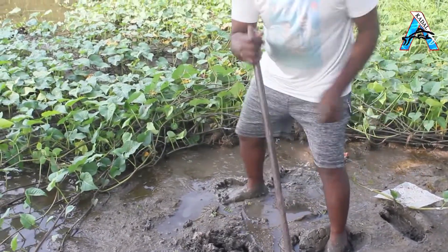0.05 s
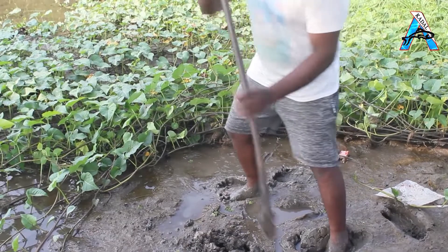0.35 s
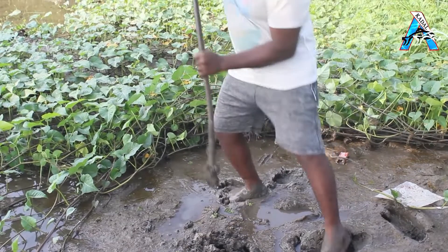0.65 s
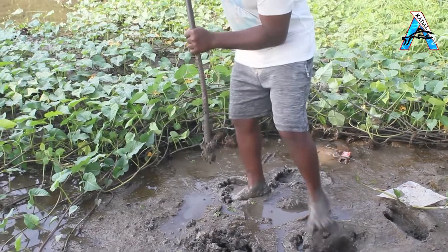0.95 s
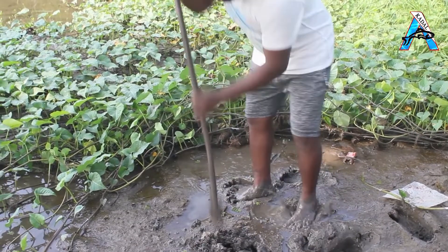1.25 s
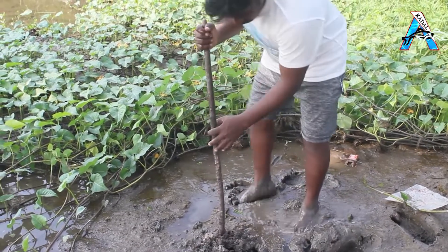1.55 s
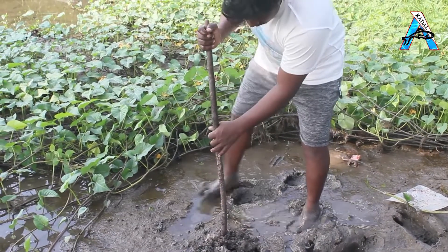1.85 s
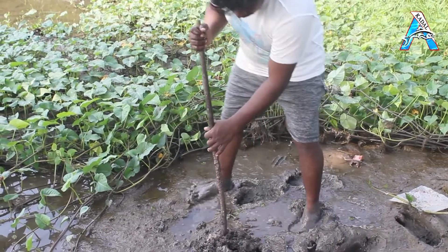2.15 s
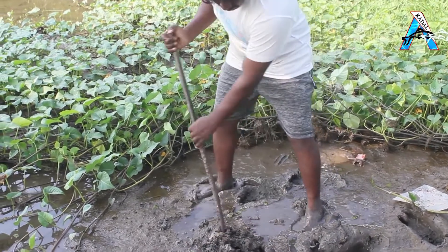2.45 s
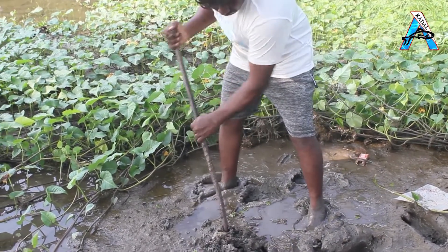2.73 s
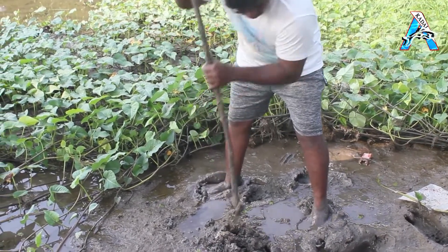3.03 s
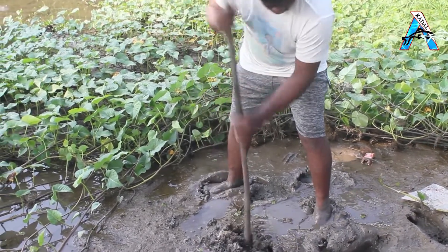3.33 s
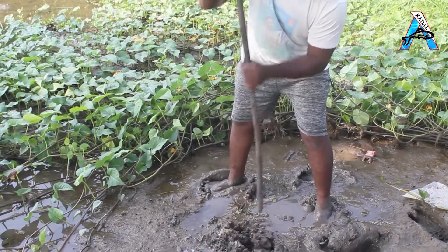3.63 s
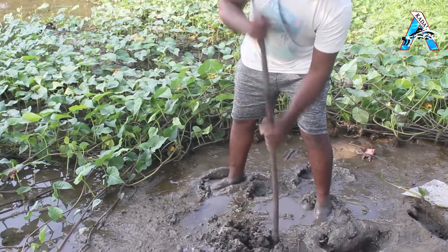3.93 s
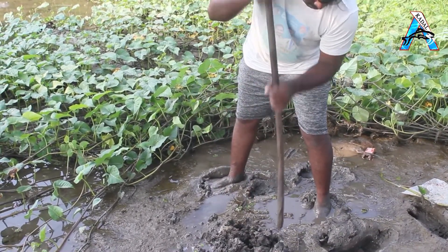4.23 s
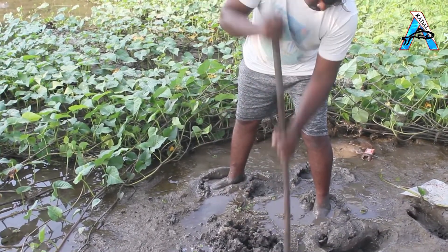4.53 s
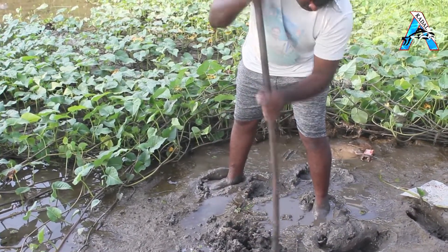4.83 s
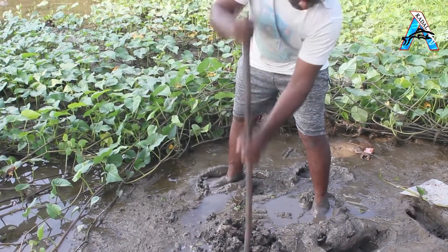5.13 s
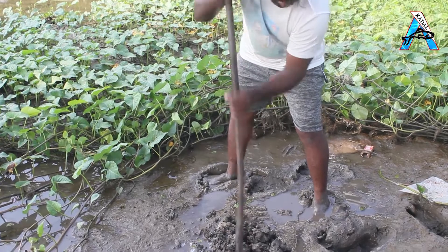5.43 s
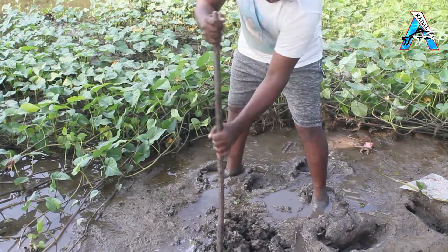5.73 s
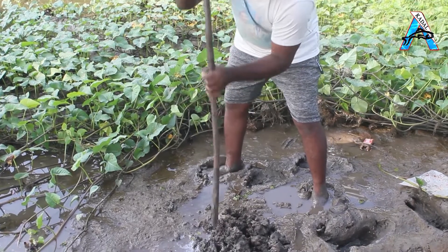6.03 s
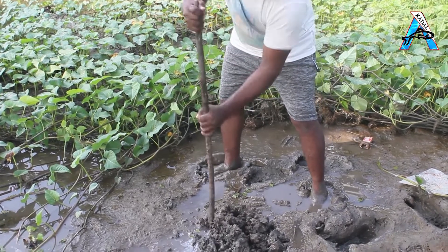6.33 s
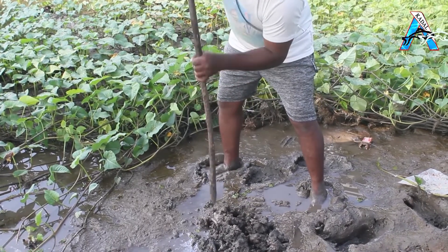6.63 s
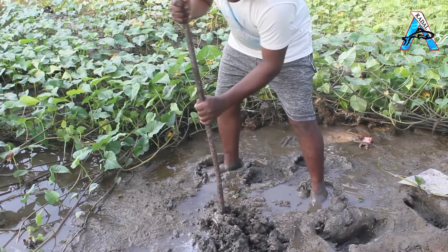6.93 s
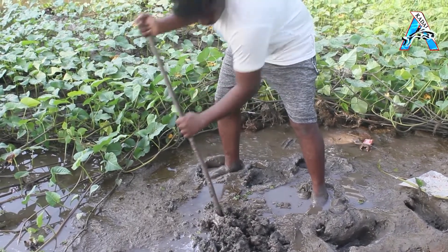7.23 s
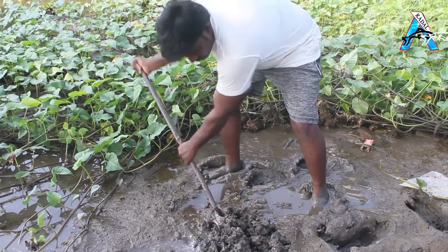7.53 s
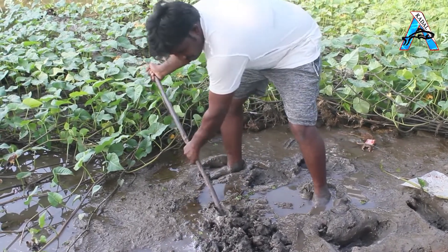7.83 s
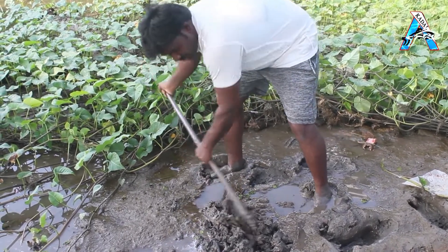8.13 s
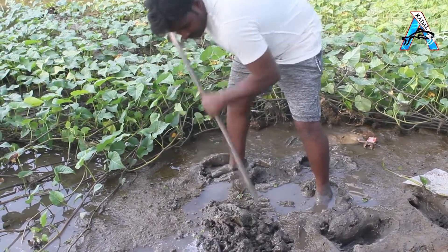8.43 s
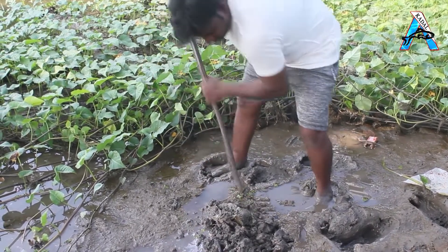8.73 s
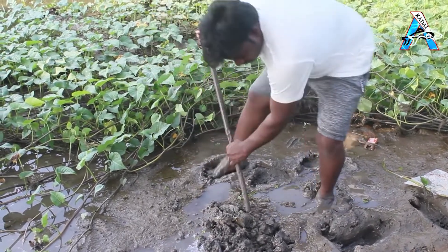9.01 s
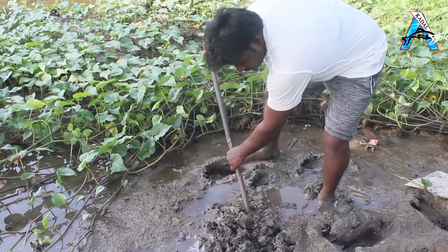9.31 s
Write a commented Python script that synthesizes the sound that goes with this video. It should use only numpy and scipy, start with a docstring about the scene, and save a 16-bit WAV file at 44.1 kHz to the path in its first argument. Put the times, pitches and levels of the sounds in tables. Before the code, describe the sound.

A metal pole jabs and scrapes in wet mud with sharp smacks and dull clanks, over faint trilling insects.

```python
"""An iron digging pole is jabbed into wet pond mud, levered and pulled out again.
Impact and friction on grit excite its bending modes, so it clanks and scrapes in its hole.
Air pockets in the mud open with wet smacks, each ringing as a damped cavity resonator.
Insects trill in the plants, a bird whistles, a rooster crows and machinery hums far off.
The banks reflect the digging and the whistles as a short echo."""
import sys
import numpy as np
from scipy import signal
from scipy.fft import next_fast_len
from scipy.io import wavfile
from scipy.ndimage import uniform_filter1d

SR = 44100
rng = np.random.default_rng(int(sys.argv[2]) if len(sys.argv) > 2 else 0)


def int16_out(signal):
    """Quantize to a 16-bit WAV file."""
    q = np.round(np.clip(np.atleast_2d(signal).T, -1, 1) * 32767)
    wavfile.write(sys.argv[1], SR, q.astype(np.int16))


N = 422037
TIME = np.arange(N) / SR

# spectra of the open air and of the insect chorus: f/Hz, level/dB
AIR_SPECTRUM = [(20, -26), (36, -49), (62, -2), (100, -3), (250, -6), (600, -10), (1500, -12.5),
                (3000, -18), (6000, -22), (9500, -82), (12000, -44), (15500, -66)]
CHORUS_SPECTRUM = [(5500, -48.5), (6700, -14.5), (7000, -6), (7400, -6.5), (7700, 1.5), (7950, 2.5),
                   (8200, -7), (8550, -5), (8800, -23), (10500, -40)]
# tones of far machinery: onset t/s, f/Hz, level/dB
HUM_TONES = [(0, 51.5, -52), (7.9, 90.9, -58.5), (8.5, 167, -59)]
# bouts of the nearest cricket: start t/s, end t/s
CRICKET_BOUTS = [(.19, 1.54), (1.94, 3.14), (3.54, 4.92), (5.11, 6.6), (6.76, 7.93), (8.33, 9.3)]
# spectra of tiny bursting films and of the film tearing over a pocket: f/Hz, level/dB
FIZZ_SPECTRUM = [(1000, -15), (3000, 6.5), (6000, -1.5), (10000, -2), (12500, -10.5), (15500, -28)]
FILM_SPECTRUM = [(100, 8), (600, -24), (2000, 10.5), (5000, 5.5), (8500, -0.5), (11000, -6), (15500, -37)]
# cavity modes: frequency ratio, level/dB, share of the brightness added to that level
CAVITY_MODES = [(1, 0, 0), (1.3, -6, 0.5), (1.75, -5, 1), (2.4, -8.5, 1)]
# air pockets opening, and the pole's 1.7 kHz clank at 8.81 s:
# t/s, level/dB, f/Hz, brightness/dB, peeling time/s
RESONANCES = [(.0505, -28.5, 1566, -6, 0.0052), (.607, -26.5, 1025, 4.5, 0.017),
              (.614, -25.5, 724, 5.5, .004), (0.714, -39, 1960, 7, .001), (.751, -39, 5040, 7, 0.0013),
              (.766, -32, 1680, 7, .004), (1.116, -37.5, 2400, -4, 0.0024), (1.171, -25, 1295, 8.5, 0.0037),
              (1.594, -38, 986, 3, 0.0026), (1.96, -37, 1480, -13.5, 0.0052), (1.983, -30, 1465, 11, 0.011),
              (2.103, -40, 2480, -1, 0.0036), (2.452, -30.5, 1840, 4.5, 0.00041),
              (2.771, -43.5, 3630, 6, .002), (3.254, -22, 202, -1, 0.0021), (3.255, -21, 990, -20, 0.0011),
              (3.332, -22, 691, -6.5, 0.0022), (3.359, -31, 734, -14, 0.0043), (4.150, -39, 366, -2, .001),
              (4.521, -35, 600, -0.5, 0.017), (4.696, -36, 580, 4, 0.013), (5.112, -36, 3170, -15, .001),
              (5.141, -30, 2030, 3, .004), (5.151, -33, 1310, -5, 0.0072), (5.166, -33.5, 132, 3, 0.0035),
              (5.373, -40.5, 1420, -4, 0.0033), (5.48, -45.5, 2520, -35, 0.0018),
              (5.915, -12.5, 1520, -4, 0.00132), (5.937, -33, 1570, -13, 0.0018),
              (6.205, -25, 1264, -7, 0.0024), (6.249, -34, 1284, 11, .002),
              (6.4255, -17.5, 1880, -4.5, 0.0027), (6.808, -26, 726, -5, 0.0043),
              (6.812, -31, 89, -4, 0.0018), (7.097, -43, 2280, -6, .001), (7.1595, -23, 1303, 3.5, 0.00066),
              (7.829, -35.5, 1130, -4, .004), (7.982, -33, 1180, -3, 0.034), (8.005, -30, 1055, 0.5, .012),
              (8.051, -35.5, 3550, -4, 0.0015), (8.813, -20, 1700, -7, .001),
              (9.158, -42.5, 3930, 2, 0.0015), (9.211, -42.5, 2070, -20, 0.0064),
              (9.503, -34.5, 713, -9.5, 0.0047)]
# reverberation of the banks: f/Hz, T60/s
BANK_DECAY = [(100, 0.62), (600, 0.55), (2000, 0.51), (5000, 0.52), (10000, 0.25), (16000, 0.18)]
# spectrum of their reflections: f/Hz, level/dB
BANK_SPECTRUM = [(150, -2.5), (700, 1), (3000, 0), (7000, -1.5), (13000, -1)]
# crows of a far rooster: t/s, duration/s, level/dB
ROOSTER_CROWS = [(0.222, .52, -54), (.718, .35, -54.5), (8.152, .27, -56.5)]
# its harmonics from the second up: level/dB
ROOSTER_HARMONICS = [-4.5, -1.5, -4.5, -16]
# bending modes of the pole: f/Hz, level/dB
POLE_MODES = [(205, -9.5), (335, 2), (690, -14.5), (900, -2.5), (1250, 2), (1690, 8), (2220, 9),
              (2820, 8.5), (3480, 10), (4200, 5.5), (4960, 8.5), (5800, 7.5), (6700, 3), (7570, 3),
              (8530, -0.5), (9620, 1), (10550, -9), (11700, -17)]
# spectrum of splatting mud: f/Hz, level/dB
MUD_SPECTRUM = [(50, -23.5), (150, -8.5), (350, 9), (520, 2), (1000, -0.5), (1800, 0.5), (3200, 3),
                (5500, -0.5), (8500, 0.5), (11000, -14), (15000, -33), (17000, -54)]
# pole levered or drawn through gritty mud: t/s, duration/s, level/dB, low churn/dB, ring/dB
POLE_STROKES = [(0.579, 0.062, -38.5, -2, -15), (1.601, .10, -51.5, 3, -17), (1.877, 0.031, -48, -14, -16),
                (2.281, 0.17, -54, 7, -8), (2.394, 0.11, -47, -17, -23), (2.552, 0.031, -47, -12, -17),
                (2.821, 0.036, -44.5, 4, -16), (4.168, 0.026, -40.5, 6, -7), (4.505, 0.081, -37.5, 1, -3.5),
                (5.112, 0.071, -38.5, -1, -4), (5.259, 0.12, -45.5, 10, 5), (5.617, .1, -43, -19, -8),
                (6.166, .049, -24, -9.5, -6), (6.206, 0.049, -32.5, -10, -12), (6.442, .093, -33, -8, -25),
                (6.766, 0.038, -34.5, -8, -6), (7.942, 0.16, -40.5, 5.5, -17),
                (9.437, 0.036, -41.5, 13, -4)]
# blows of the pole: t/s, level/dB, crushing time/s, low thud/dB, treble/dB, ring/dB
POLE_BLOWS = [(1.333, -27, 0.01, -8, 9, -5), (1.375, -23.5, 0.0056, -3.5, 6, 1.5),
              (3.253, -14, 0.0027, 6.5, 1.5, 1.5), (3.287, -22, 0.0024, -14, 3, 19),
              (3.331, -27.5, 0.0059, 5, 2.5, 9), (3.885, -8, 0.0031, -23.5, 1.5, 0),
              (3.909, -19.5, 0.009, -10.5, -8, -16), (5.131, -23.5, .012, -31, 4.5, -2),
              (6.423, -25, 0.0026, -1.5, -7, -1.5), (6.808, -29.5, 0.0022, 7, -4, -5),
              (8.812, -13.5, 0.0078, 6.5, -6, 9), (8.868, -21, 0.0095, 0.5, -13, -4.5)]
# bird whistles: t/s, level/dB
BIRD_WHISTLES = [(3.2, -53), (6.04, -59), (6.27, -55), (6.535, -46), (6.805, -61), (7.068, -42)]


def amp(db):
    """Amplitude ratio of a level in decibels."""
    return 10 ** (np.asarray(db) / 20)


def unit_rms(x):
    """Normalisation to an rms of one."""
    return x / np.sqrt(np.mean(x ** 2) + 1e-20)


def equal_energy(x):
    """Normalisation to the energy of 10 ms at an rms of one."""
    return x / np.sqrt(np.sum(x ** 2) / (SR / 100) + 1e-20)


def value_at(points, hz):
    """Interpolation of a table on a log-frequency axis."""
    f, value = np.transpose(points)
    return np.interp(np.log(hz + 1), np.log(f + 1), value)


def colour(x, spectrum):
    """Minimum-phase filtering: the phase follows from the log gain by a Hilbert transform."""
    size = next_fast_len(len(x) + 2048)
    log_gain = np.log(amp(value_at(spectrum, abs(np.fft.fftfreq(size, 1 / SR)))))
    response = np.exp(np.conj(signal.hilbert(log_gain)))
    return np.fft.ifft(np.fft.fft(x, size) * response).real[:len(x)]


def drift(per_s):
    """Random modulation of rms one, linear between Gaussian knots."""
    knots = rng.standard_normal(int(N / SR * per_s) + 3)
    return unit_rms(np.interp(TIME * per_s, np.arange(len(knots)), knots))


def add(mix, start, sound):
    """Superposition of a sound from its starting time in seconds."""
    part = mix[max(round(start * SR), 0):][:len(sound)]
    part += sound[:len(part)]


def grit(count, spread_db):
    """Granular noise: exponentially distributed levels give many small grains and a few large."""
    noise = rng.standard_normal(count)
    grain_db = spread_db * np.minimum(rng.exponential(1, count // 16 + 1), 4)
    return unit_rms(noise * amp(grain_db).repeat(16)[:count])


def air_and_hum(air_db=-50, onset_s=0.053):
    """Broadband air noise, and machine tones that waver by random quadrature modulation."""
    air = amp(air_db) * unit_rms(colour(rng.standard_normal(N), AIR_SPECTRUM)) * amp(0.14 * drift(3.1))
    for start, hz, db in HUM_TONES:
        phase = 2 * np.pi * hz * TIME
        tone = unit_rms((0.53 + drift(17)) * np.sin(phase) + drift(29) * np.cos(phase))
        air += amp(db) * tone * np.clip((TIME - start) / onset_s, 0, 1)
    return air


def insects(chorus_db=-48, shrill_db=-54, shrill_hz=7920, wing_hz=15.5):
    """A far chorus merges into band noise; wing strokes modulate one shrill insect's tone."""
    chorus = unit_rms(colour(rng.standard_normal(N), CHORUS_SPECTRUM)) * amp(drift(60))
    stroke = np.cumsum(wing_hz + 0.483 * drift(3)) / SR % 1
    pitch = shrill_hz - 160 * (stroke - .5) + 60 * drift(250)  # each stroke sags in pitch
    flutter = (0.18 + np.sin(np.pi * stroke) ** 2) * amp(2 * drift(40))
    shrill = np.sin(2 * np.pi * np.cumsum(pitch) / SR) * flutter
    return amp(chorus_db) * chorus + amp(shrill_db) * unit_rms(shrill)


def cricket(db=-51.5, hz=7085, throb_hz=9):
    """Amplitude modulation makes a nearly pure tone throb, in bouts."""
    singing = uniform_filter1d(sum(1. * ((TIME > a) & (TIME < b)) for a, b in CRICKET_BOUTS), 900)
    throb_phase = 2 * np.pi * np.cumsum(throb_hz + 0.57 * drift(2.12)) / SR
    throb_db = 1.8 * np.sin(throb_phase) + 3.9 * drift(90)
    tone = np.sin(2 * np.pi * np.cumsum(hz + 35 * drift(200)) / SR)
    return amp(db) * unit_rms(tone * amp(throb_db)) * singing


def fizz(db=-60):
    """Tiny films bursting in the trodden mud sum to granular noise, in uneven flurries."""
    films = colour(grit(N, spread_db=5), FIZZ_SPECTRUM)
    flurry_db = 1.8 * drift(9)
    return amp(db + flurry_db) * unit_rms(films)


def smack(hz, decay_s, bright_db, film_db, rise=0.18, wet_db=-6, leak_db=-18):
    """Cavity resonance: a mud film tears and the pocket behind rings, rising in pitch as it opens."""
    t = np.arange(SR // 12) / SR
    phase = 2 * np.pi * np.cumsum(hz * (1 + rise * np.tanh(t / decay_s - 1))) / SR
    fade = np.exp(-t / decay_s) * (1 - np.exp(-8 * t / decay_s))
    cavity = fade * sum(amp(db + share * bright_db) * np.sin(ratio * phase)
                        for ratio, db, share in CAVITY_MODES)
    spatter = signal.fftconvolve(cavity * fade, grit(len(t), 5.5) * fade)[:len(t)]
    film = colour(grit(len(t), 1.4) * fade, FILM_SPECTRUM)
    sound = equal_energy(cavity) + amp(wet_db) * equal_energy(spatter) + amp(film_db) * equal_energy(film)
    # little escapes below the resonance
    low_cut = [(hz / 30, leak_db), (hz / 6, leak_db / 6), (hz * 0.57, leak_db), (hz * 0.93, 0)]
    return equal_energy(colour(sound, low_cut))


def pockets_and_clank(typical_hz=1510, typical_db=-28, typical_decay_s=0.0028, quick_peel_s=0.0005):
    """Damped resonances: pockets peel, smack open and slump; one pole clank takes the same form."""
    out = np.zeros(N)
    for start, db, hz, bright_db, peel_s in RESONANCES:
        pull_db, smallness = db - typical_db, hz / typical_hz
        # small or hard-pulled pockets die sooner
        decay_s = typical_decay_s * smallness ** -0.46 * amp(-0.2 * pull_db)
        # small, weak, bright pockets are mostly tearing film
        film_db = -3 + 3.9 * np.log2(smallness) - 0.35 * pull_db + 0.44 * bright_db
        # a quick peel snaps; a slower one is fainter with each doubling
        peel_db = -3.5 - 3 * np.log2(max(peel_s / quick_peel_s, 1))
        tick = smack(hz=2636, decay_s=0.00071, bright_db=-6.5, film_db=-20)
        add(out, start - peel_s, amp(db + peel_db) * tick)
        add(out, start, amp(db) * smack(hz, decay_s, bright_db, film_db))
        plop = smack(hz=185, decay_s=0.0011, bright_db=-5, film_db=-25)
        add(out, start, amp(db - 18.5) * plop)
    return out


def bank_echo(x, echo_s=.0255, echo_db=-17, tail_db=-13, build_s=0.0062):
    """Reflection from banks and plants: one discrete echo and an exponentially decaying scatter."""
    t = np.arange(SR * 3 // 4) / SR
    hz, age, noise = signal.stft(rng.standard_normal(len(t)), SR, nperseg=256)
    decay = amp(-60 * age / value_at(BANK_DECAY, hz)[:, None])
    tail = signal.istft(noise * decay, SR, nperseg=256)[1][:len(t)]
    tail *= 1 - np.exp(-t / build_s)
    response = amp(tail_db) * tail / np.linalg.norm(tail)
    response[round(echo_s * SR)] += amp(echo_db)
    return signal.fftconvolve(x, colour(response, BANK_SPECTRUM))[:N]


def bubbles(faintest_db=-54, spread_db=2, lowest_hz=1300, count=42):
    """Tiny bubbles pop at random in the trodden mud, each with its own resonance and damping."""
    out = np.zeros(N)
    for when, size, pitch, damping in rng.random((count, 4)):
        pop = smack(lowest_hz * 3 ** pitch, 0.0012 + .0025 * damping, bright_db=-14.5, film_db=-18)
        add(out, when * N / SR, amp(faintest_db + spread_db * min(-np.log(size), 2)) * pop)
    return out


def rooster(hz=485):
    """A harmonic series without its fundamental: drawn-out crowing, smeared by distance."""
    out = np.zeros(N)
    for start, length, db in ROOSTER_CROWS:
        count = int(length * SR)
        pitch = hz * (1 + 0.0065 * drift(6.2) + 0.02 * drift(127))[:count]
        phase = 2 * np.pi * np.cumsum(pitch) / SR
        call = sum(amp(level) * np.sin(k * phase) for k, level in enumerate(ROOSTER_HARMONICS, 2))
        call *= amp(3 * drift(25)[:count])
        add(out, start, amp(db) * unit_rms(call) * signal.windows.tukey(count, .5))
    return out


def pole_in_mud(force, low_db, treble_db, ring_db, t60_s=0.065, detune=0.021, delay_1khz_s=0.001816):
    """A tip force splats mud and rings the pole; by dispersion, high bending waves arrive first."""
    t = np.arange(SR // 5) / SR
    response = np.zeros(len(t))
    for hz, db in POLE_MODES:
        age = np.maximum(t - delay_1khz_s * np.sqrt(1000 / hz), 0)
        loaded_hz = hz * (1 + detune * rng.uniform(-0.5, 1))  # grip and mud detune the mode
        response += amp(db - 60 * age / t60_s) * np.sin(2 * np.pi * loaded_hz * age)
    splat = unit_rms(colour(force, MUD_SPECTRUM))
    ring = unit_rms(signal.fftconvolve(force, response)[:len(force)])
    shelves = [(40, low_db - 18.5), (160, low_db), (350, low_db),
               (1300, 0.039), (2400, 0.041), (6000, treble_db)]
    return colour(splat + amp(ring_db) * ring, shelves)


def squelch(count, per_s=260, spread_db=4, lowest_hz=850):
    """Bubbles squeezed out of the mud resonate in a dense random run."""
    out = np.zeros(count + SR // 8)
    for when, size, pitch in rng.random((int(per_s * count / SR) + 1, 3)):
        pop = smack(lowest_hz * 5 ** pitch, decay_s=.0018, bright_db=-10, film_db=-8)
        add(out, when * count / SR, amp(spread_db * min(-np.log(size), 3)) * pop)
    return out


def rub(length, low_db, treble_db, ring_db, fade_db=3):
    """Sliding friction: grit drives the slowing pole, which squeezes out bubbles."""
    count = int(length * SR)
    envelope = signal.windows.tukey(count, .25) * amp(-fade_db * np.linspace(0, 1, count))
    force = np.pad(grit(count, spread_db=4) * envelope, (0, SR // 8))
    sound = unit_rms(pole_in_mud(force, low_db, treble_db, ring_db))
    bubbles_db = -4 - max(ring_db, 0) - max(treble_db, 0)  # hard grit holds little air
    sound += amp(bubbles_db) * unit_rms(squelch(count))
    return sound / np.sqrt(np.sum(sound ** 2) / count)


def scrapes(typical_db=-44, slide_s=.055, slide_delay_s=.009):
    """Friction as the pole is worked in its hole and as it sinks further after every blow."""
    out = np.zeros(N)
    for start, length, db, low_db, ring_db in POLE_STROKES:
        # light strokes graze the wet surface and hiss; heavy ones are buried and dull
        treble_db = 1.5 - 0.5 * (db - typical_db)
        add(out, start, amp(db) * rub(length, low_db, treble_db, ring_db))
    for start, db, _, low_db, treble_db, ring_db in POLE_BLOWS:
        slide = rub(slide_s, low_db, treble_db - 11, ring_db + 0.5)
        slide_db = db - 15.5 + 0.25 * low_db  # a deeper thud means softer mud and a harder slide
        add(out, start + slide_delay_s, amp(slide_db) * slide)
    return out


def jabs(contact_db=-6, contact_s=.00004):
    """Impact excitation: the tip lands, cushioned by mud, then crushes grit for some milliseconds."""
    out, t = np.zeros(N), np.arange(SR // 4) / SR
    contact = amp(contact_db) * equal_energy(t * np.exp(-t / contact_s))
    for start, db, crush_s, low_db, treble_db, ring_db in POLE_BLOWS:
        # the negative spread turns the outlying grains into brief dips in the force
        crush = equal_energy(grit(len(t), spread_db=-4.8) * np.exp(-t / crush_s))
        clank = pole_in_mud(contact + crush, low_db, treble_db, ring_db)
        add(out, start, amp(db) * equal_energy(clank))
    return out


def bird(length_s=0.07, from_hz=4350, to_hz=3200, jitter_hz=500, upper_db=-9):
    """A falling frequency glide: the second and third harmonics of a far bird's whistle."""
    out, count = np.zeros(N), int(length_s * SR)
    for start, db in BIRD_WHISTLES:
        pitch = np.linspace(from_hz, to_hz, count) + jitter_hz * rng.standard_normal(count)
        phase = 2 * np.pi * np.cumsum(pitch) / SR
        whistle = np.sin(phase) + amp(upper_db) * np.sin(1.5 * phase)
        add(out, start, amp(db) * np.hanning(count) * whistle)
    return out


def scene():
    """Superposition of the digging, the bird, their echo and the background of the pond."""
    direct = jabs() + scrapes() + pockets_and_clank() + bubbles() + fizz() + bird()
    return (direct + bank_echo(direct) + insects() + cricket() + rooster() + air_and_hum())[None]


def record(dry, ceiling=.95, cutoff_hz=15700):
    """Hard clipping limits the strongest peaks; a low-pass filter then limits the band."""
    low_pass = signal.firwin(511, cutoff_hz, window=("kaiser", 9), fs=SR)
    return signal.oaconvolve(np.clip(dry, -ceiling, ceiling), low_pass[None], "same")


dry = scene()
out = record(dry)
int16_out(out)
```